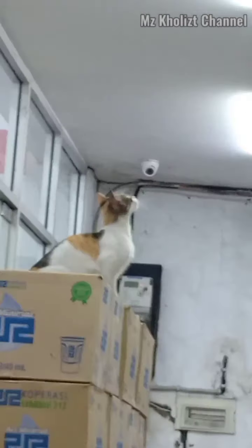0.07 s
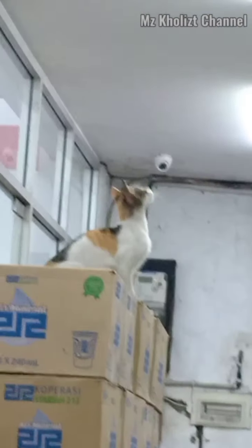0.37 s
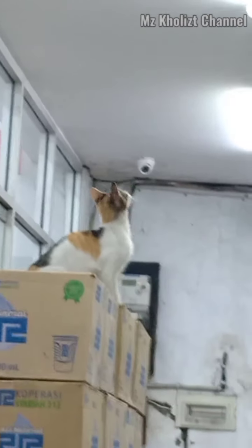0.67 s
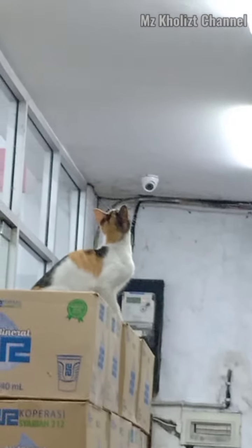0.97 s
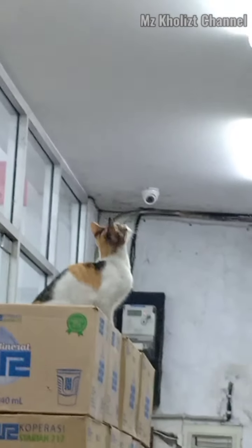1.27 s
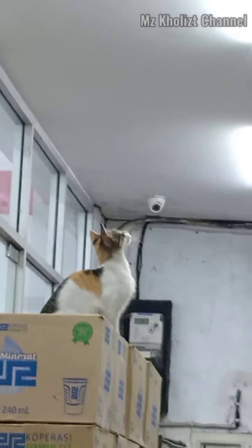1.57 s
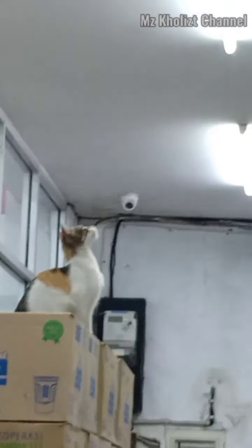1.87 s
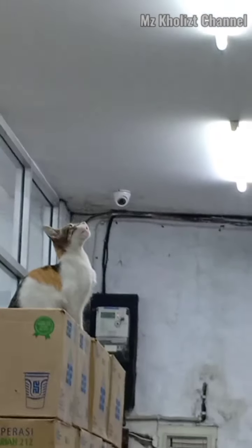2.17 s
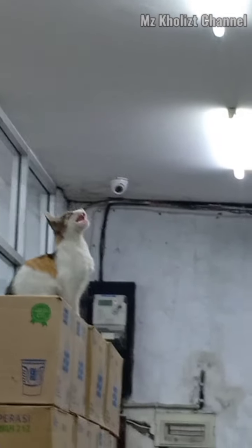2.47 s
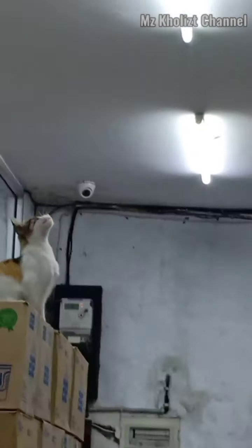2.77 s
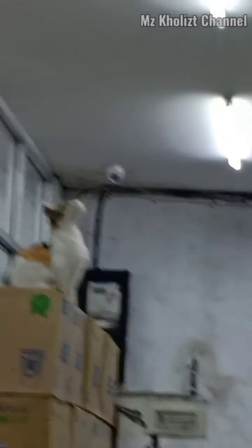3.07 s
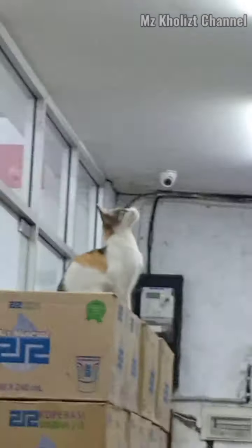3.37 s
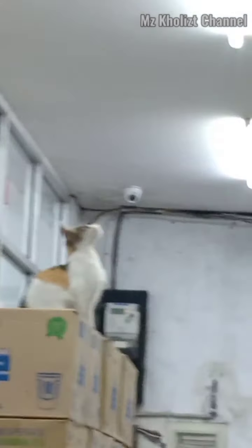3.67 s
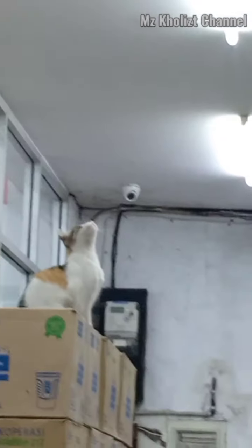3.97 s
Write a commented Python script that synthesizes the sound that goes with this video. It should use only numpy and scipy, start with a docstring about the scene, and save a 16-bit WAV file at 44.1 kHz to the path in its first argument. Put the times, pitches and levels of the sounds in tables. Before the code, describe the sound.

Rapid wet clicking chatter from a cat, followed by a soft meow in a humming room.

```python
"""A hard-walled room, heard through a stereo pair of microphone ports. On a stack of boxes a cat chatters
at the ceiling, about five smacks a second, then gives one faint meow. Each smack is a wet hiss, a
crackle of snaps that ring in the small mouth cavity, and a lower pop as the mouth opens.
Behind the cat the room hums and a distant whine sinks; both fade away."""
import sys
import numpy as np
from scipy import signal
from scipy.fft import rfft, irfft
from scipy.io import wavfile

SR = 44100
rng = np.random.default_rng(int(sys.argv[2]) if len(sys.argv) > 2 else 0)


def store_wav(level_fs):
    """Save 16-bit WAV to argv[1]."""
    pcm = np.round(np.clip(np.atleast_2d(level_fs), -1, 1) * 32767)
    wavfile.write(sys.argv[1], SR, pcm.T.astype(np.int16))


N = 176400
TIME = np.arange(N) / SR

# The smacks: peak t/s, hiss lead/s, hiss level/dB, crackle level/dB, mouth ring f/Hz,
# pop delay/s, pop level/dB, pop f/Hz, sparkle (bubbles and glassy ring) gain/dB
SMACKS = [(.0765, 0.019, -34.5, -25, 4640, -0.014, -33, 2300, -21),
          (.2515, .012, -48, -23.5, 5850, -0.0056, -19, 2300, -22),
          (.4522, 0.026, -36, -17, 5250, 0.00078, -12, 2530, -6),
          (.6568, .027, -29.5, -21, 5550, 0.0078, -13.5, 2380, 1.5),
          (.846, .024, -36, -16.5, 5610, 0.0037, -18, 2050, -4),
          (1.0671, 0.035, -30, -21, 5490, -0.00046, -14, 2380, -2.5),
          (1.2714, 0.024, -33.5, -23, 4920, -.0006, -17.5, 2180, -2.5),
          (1.477, 0.026, -44, -19, 5240, 0.0026, -15.5, 2380, -5.5),
          (1.697, 0.022, -36, -18.5, 5560, 0.0039, -14.5, 2400, -3),
          (1.902, 0.02, -38, -19.5, 5530, .0014, -14, 2230, -2)]
# Sharp snaps of the parting lips and tongue: t/s, level/dB
SHARP_SNAPS = [(0.0765, -8), (0.243, -12), (.2522, -18), (0.439, -19), (0.4422, -13), (0.4506, -10),
               (0.4518, -7), (0.455, -14), (0.647, -16), (0.6554, -8), (0.658, -8), (.66, -11),
               (0.8373, -8), (0.8378, -16), (0.842, -13), (0.8468, -8), (.848, -4.5), (.85, -6), (1.06, -9),
               (1.0622, -9), (1.0675, -10), (1.0692, -18), (1.269, -10), (1.2715, -11), (1.2739, -12),
               (1.472, -7), (1.477, -4.5), (1.4786, -8), (1.48, -20), (1.6904, -7.5), (1.697, -10.5),
               (1.7039, -11), (1.897, -15), (1.9002, -14), (1.9022, -8.5)]
# Spectra of a snap's tick, the wet hiss and the puff of air at the pop: f/Hz, relative level/dB
TICK_SPECTRUM = [(100, -13), (500, -7), (2600, -2.5), (3700, 2.5), (7500, 0.5), (9500, -7), (11500, -14),
                 (13700, 0), (16500, -24)]
HISS_SPECTRUM = [(300, -38), (2000, -19), (5000, -4.5), (6200, 4), (7000, -17), (9500, -12.5), (12500, -18),
                 (13800, -18), (15200, -20), (16300, -32)]
PUFF_SPECTRUM = [(150, -24), (500, 1), (1000, 0), (1700, 2), (2300, 1), (3000, -2.5), (4500, -12.5),
                 (9000, -39)]
# Course of the meow: t/s, pitch f/Hz, level/dB
MEOW_COURSE = [(2.25, 545, -60), (2.285, 553, -44.5), (2.335, 550, -39.5), (2.385, 522, -40.5),
               (2.425, 510, -43), (2.47, 508, -40.5), (2.56, 496, -42), (2.578, 494, -64)]
# Resonances of the throat: f/Hz, gain/dB
THROAT_GAIN = [(500, -22), (1100, -19), (1650, -8.5), (2000, 0), (2250, 0), (2550, -6), (2780, -8),
               (3150, -15), (3850, -19), (4500, -35)]
# Decay of the room's tail: f/Hz, t60/s
ROOM_DECAY = [(200, 0.1), (2000, 1.5), (5200, 0.53), (9000, 0.26)]
# Colour of that tail: f/Hz, gain/dB
TAIL_COLOUR = [(200, 23.5), (2000, 3.5), (5200, 0)]
# Course of the distant whine: t/s, f/Hz, level/dB
WHINE_COURSE = [(0, 1450, -57), (.25, 1443, -34.5), (.5, 1413, -32), (.75, 1396, -32.5), (.92, 1357, -38.5),
                (1.3, 1349, -38), (1.6, 1384, -41), (2.5, 1340, -57)]
# Tones in the hum: f/Hz, width/Hz, level/dB relative to the hum
HUM_TONES = [(126.4, 8.3, -6.5), (195, 9.6, -12.5), (162.7, 16, -11.5)]
# Spectra of the hum's rumble and of the airy room noise: f/Hz, relative level/dB
RUMBLE_SPECTRUM = [(20, -41), (38, -39), (50, -24), (62, -9.5), (80, -10), (105, -4), (128, -1.5),
                   (155, -4.5), (190, -6), (235, -11), (400, -28), (900, -78)]
AIR_SPECTRUM = [(100, -14), (290, 0.5), (520, -0.5), (1300, -3.5), (1700, -0.5), (2400, -3), (2850, -8.5),
                (3400, -17), (4100, -21.5), (5100, -16), (6100, -19.5), (7500, -32), (12400, -40),
                (13600, -31.5), (15300, -38), (16000, -58)]
# Fade of the room tone: t/s, hum level/dB, air level/dB
ROOM_TONE_FADE = [(0, -30, -29), (.3, -32, -28.2), (.7, -33, -30.5), (1.4, -38.5, -34), (2.1, -39.5, -38),
                  (2.8, -41.5, -40), (4, -42.5, -41.5)]
# Likeness of the room noise at the two ports: f/Hz, coherence
PORT_COHERENCE = [(130, 0.97), (290, 0.9), (640, 0.64), (1410, 0.29), (4400, 0), (15000, 0.9)]
# Leftward lean of the cat and of the room noise, which ports() scales for each side: f/Hz, lean/dB
CAT_LEAN = [(700, -1.5), (1300, -6.5), (2300, 10), (3300, 5.5), (4600, -4), (6100, -0.5), (8100, 2.5)]
NOISE_LEAN = [(700, -1.1), (1300, 0.9), (2380, 2.5), (4400, -7), (6200, 0.5)]


def chatter(tick_db=4.5, pop_rise_s=.00048, puff_db=-9.5, puff_width_s=.0058, grain_db=3.5):
    """Wet lips part with a hiss and bubbles, snap and crackle; the opening mouth pops and puffs air."""
    rings, ticks, hiss_level, puff_level = np.zeros((4, N))
    for peak_s, lead_s, hiss_db, crackle_db, mouth_hz, pop_delay_s, pop_db, pop_hz, sparkle_db in SMACKS:
        start_s, pop_s = peak_s - lead_s, peak_s + pop_delay_s
        for s, size in snaps(start_s, peak_s, crackle_db):
            add(rings, s, size * mouth_ring(mouth_hz, s - peak_s, sparkle_db))
            add(ticks, s, [size])
        for s, sound in saliva_bubbles(start_s, lead_s, sparkle_db):
            add(rings, s, sound)
        add(rings, pop_s, amp(pop_db) * ring(pop_hz, pop_rise_s, sag_per_s=71))
        puff_level += amp(pop_db + puff_db) * np.exp(-abs(TIME - pop_s) / puff_width_s)
        add(hiss_level, start_s, amp(hiss_db) * hiss_envelope(lead_s))
    grainy_noise = rng.standard_normal(N) * amp(grain_db * drift(rate_hz=1800))
    hiss = hiss_level * unit(colour(grainy_noise, HISS_SPECTRUM))
    puff = puff_level * unit(colour(rng.standard_normal(N), PUFF_SPECTRUM))
    return rings + amp(tick_db) * colour(ticks, TICK_SPECTRUM) + hiss + puff


def snaps(start_s, peak_s, crackle_db, count=48, per_s=800, build_s=.017, fade_s=.0071, spread_db=7.5):
    """Lips and tongue part: (time, size) of a few sharp snaps in a crackle that builds and dies."""
    jitter, strength = rng.random((2, count))
    times = start_s + (np.arange(count) + jitter) / per_s
    building = (peak_s - times) / build_s
    fading = ((times - peak_s).clip(0) / fade_s) ** 2
    sizes = np.exp(-np.maximum(building, fading)) * amp(crackle_db + spread_db * (2 * strength - 1))
    sharp = [(s, amp(db)) for s, db in SHARP_SNAPS if start_s < s < times[-1]]
    return sharp + list(zip(times, sizes))


def mouth_ring(hz, after_peak_s, sparkle_db, sag_per_s=7, glassy_hz=14240, glassy_db=-18):
    """A snap rings the mouth cavity, lower as the mouth widens, with a glassy ring on top."""
    detune, glassy_detune = 1 + .04 * rng.standard_normal(2)
    cavity = ring(detune * hz * np.exp(-sag_per_s * after_peak_s), rise_s=.00028)
    glassy = ring(glassy_detune * glassy_hz, rise_s=.00034)
    return cavity + amp(glassy_db + sparkle_db) * glassy


def saliva_bubbles(start_s, lead_s, sparkle_db, count=12, low_hz=8500, high_hz=14800):
    """Tiny bubbles burst, most thickly just as the lips part: (time, sound) of each."""
    for when, pitch, size in rng.random((count, 3)):
        burst = ring(high_hz - pitch ** 2 * (high_hz - low_hz), rise_s=.00012)
        yield start_s + when ** 2 * lead_s, amp(-35 + sparkle_db + 15 * size) * burst


def hiss_envelope(lead_s, attack_s=.0018, lip_db=5, lip_decay_s=.0015, swell_db=2,
                  overhang_s=.0042, release_s=.0039):
    """The first parting of the lips stands out; then the hiss grows towards the snaps and dies."""
    t = np.arange(SR // 10) / SR
    attack = np.minimum(t / attack_s, 1) * (1 + amp(lip_db) * np.exp(-t / lip_decay_s))
    swell = amp(swell_db * (np.minimum(t / lead_s, 1) - .5))
    release = np.exp(-(t - lead_s - overhang_s).clip(0) / release_s)
    return attack * swell * release


def meow(jitter=.012, rasp_depth=.5, open_s=2.375, open_width_s=.045, open_db=6.5):
    """A thin, wavering, falling call, raspiest mid-way; the throat favours harmonics four and five."""
    hz, db = curves(MEOW_COURSE)
    start_s, end_s = MEOW_COURSE[0][0], MEOW_COURSE[-1][0]
    arch = np.sin(np.pi * np.interp(TIME, [start_s, end_s], [0, 1]))
    hz = hz * (1 + jitter * arch * drift(rate_hz=90))
    phase = 2 * np.pi * np.cumsum(hz) / SR
    # the mouth opens briefly and lifts the fifth harmonic
    lift_db = open_db * np.exp(-((TIME - open_s) / open_width_s) ** 2)
    voice = sum(amp(read(THROAT_GAIN, k * hz) + lift_db * (k == 5)) * np.sin(k * phase)
                for k in range(1, 10))
    rasp = 1 + rasp_depth * arch ** 2 * drift(rate_hz=200)
    return unit(voice) * rasp * amp(db) * (TIME > start_s) * (TIME < end_s)


def in_room(x, early_db, tail_db, left_lag_s=.00015, early_t60_s=.082):
    """The cat at the microphone: direct sound, quick corner and ceiling reflections, the room's tail."""
    hz = np.fft.rfftfreq(N, 1 / SR)
    left = irfft(rfft(x) * np.exp(-2j * np.pi * hz * left_lag_s), N)
    early = amp(early_db) * reverb(x, [(1, early_t60_s)])
    tail = amp(tail_db) * reverb(colour(x, TAIL_COLOUR), ROOM_DECAY)
    return ports(np.array([left, x]) + early + tail, CAT_LEAN)


def reverb(x, t60, size=256):
    """Diffuse reflections, different at each port; t60 lists f/Hz, t60/s."""
    hz, t, noise = signal.stft(rng.standard_normal((2, SR // 2)), SR, nperseg=size)
    decaying = noise * amp(-60 * t / read(t60, hz)[:, None])
    tail = signal.istft(decaying, SR, nperseg=size)[1]
    return signal.fftconvolve(x[None], tail / np.linalg.norm(tail[0]), axes=1)[:, :N]


def whine(split_hz=56, width_hz=26, upper_ratio=1.24, upper_db=-1.5):
    """Far off, two close wavering tones and a weaker upper one, diffuse at the ports."""
    hz, db = curves(WHINE_COURSE)
    tones = [(hz - split_hz / 2, 1), (hz + split_hz / 2, 1), (upper_ratio * hz, amp(upper_db))]
    pair = [sum(size * wavering_tone(f, width_hz) for f, size in tones) for _ in range(2)]
    return amp(db) * unit(np.array(pair))


def room_tone(rumble_db=-2):
    """The room hums with three wavering tones and a rumble, under airy noise; all of it fades."""
    hum_db, air_db = curves(ROOM_TONE_FADE)
    tones = sum(amp(hum_db + db) * wavering_tone(hz, width_hz) for hz, width_hz, db in HUM_TONES)
    return tones + room_noise(RUMBLE_SPECTRUM, hum_db + rumble_db) + room_noise(AIR_SPECTRUM, air_db)


def room_noise(spectrum, db):
    """Noise that is alike at both ports in the bass and the top treble, diffuse in between."""
    hz = np.fft.rfftfreq(N, 1 / SR)
    left, unrelated = rfft(rng.standard_normal((2, N))) * amp(read(spectrum, hz))
    coherence = read(PORT_COHERENCE, hz)
    right = coherence * left + np.sqrt(1 - coherence ** 2) * unrelated
    return unit(ports(irfft(np.array([left, right]), N), NOISE_LEAN)) * amp(db)


def ports(pair, lean):
    """Each microphone port colours the sound in its own way."""
    return np.array([colour(pair[0], lean, share=.74), colour(pair[1], lean, share=-.43)])


def ring(hz, rise_s, sag_per_s=0, size=400):
    """A cavity rings for a few cycles, sinking if it widens; the envelope peaks at 1."""
    t = np.arange(size) / SR
    phase = 2 * np.pi * np.cumsum(hz * np.exp(-sag_per_s * t)) / SR
    return t / rise_s * np.exp(1 - t / rise_s) * np.sin(phase)


def wavering_tone(hz, width_hz):
    """A tone of rms 1 whose level and phase wander."""
    phase = 2 * np.pi * np.cumsum(hz * np.ones(N)) / SR
    return drift(width_hz) * np.cos(phase) + drift(width_hz) * np.sin(phase)


def drift(rate_hz):
    """Smooth random wander of rms 1."""
    hz = np.fft.rfftfreq(N, 1 / SR)
    return unit(irfft(rfft(rng.standard_normal(N)) / (1 + (hz / rate_hz) ** 2) ** 2, N))


def colour(x, points, share=1, size=2048):
    """Causal filter with the given spectrum, its dB scaled by share."""
    hz = abs(np.fft.fftfreq(size, 1 / SR))
    log_gain = np.log(amp(share * read(points, hz)))
    taps = np.fft.ifft(np.exp(np.conj(signal.hilbert(log_gain)))).real  # minimum phase
    return signal.oaconvolve(x, taps[:size // 2])[:len(x)]


def read(points, hz):
    """Reads a table on a log-frequency axis."""
    f, value = np.transpose(points)
    return np.interp(np.log(hz + 1), np.log(f), value)


def curves(rows):
    """The columns of a time table, one value per sample."""
    s, *columns = np.transpose(rows)
    return [np.interp(TIME, s, column) for column in columns]


def add(mix, s, sound):
    """Mixes a sound in at time s."""
    part = mix[round(s * SR):][:len(sound)]
    part += sound[:len(part)]


def amp(db):
    """Decibels to gain."""
    return 10 ** (np.asarray(db) / 20)


def unit(x):
    """Scales to rms 1."""
    return x / np.sqrt(np.mean(x ** 2) + 1e-20)


def scene():
    """The cat in front, room tone and the distant whine behind."""
    background = room_tone() + whine()
    smacks = in_room(chatter(), early_db=-8.5, tail_db=-17.5)
    call = in_room(meow(), early_db=-17, tail_db=-25)
    return smacks + call + background


def record(dry, edge_hz=16300):
    """The recorder's band limit."""
    lowpass = signal.firwin(401, edge_hz, window=("kaiser", 9), fs=SR)
    return signal.oaconvolve(dry, lowpass[None], "same")


dry = scene()
out = record(dry)
store_wav(out)
```